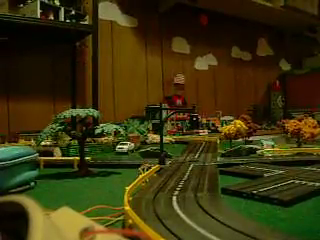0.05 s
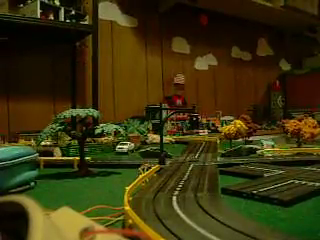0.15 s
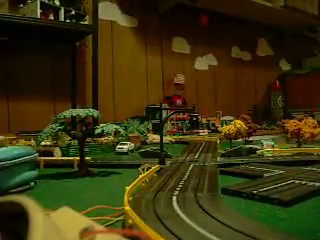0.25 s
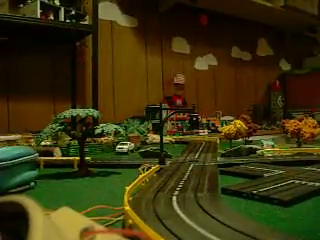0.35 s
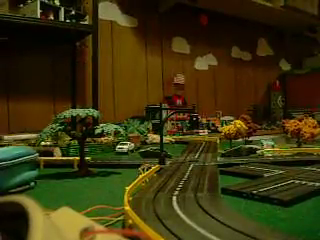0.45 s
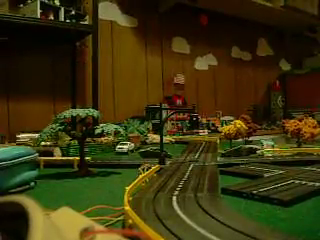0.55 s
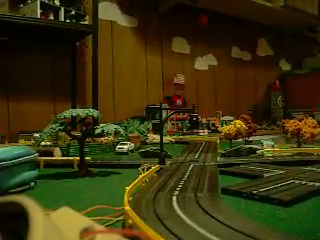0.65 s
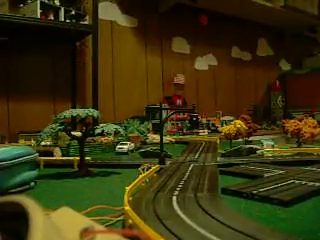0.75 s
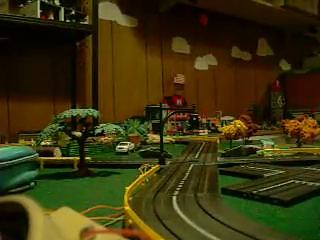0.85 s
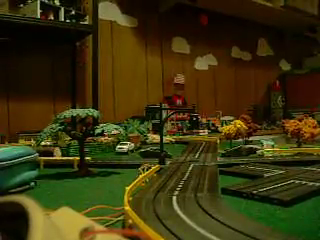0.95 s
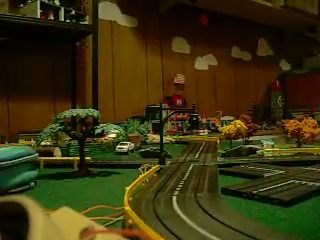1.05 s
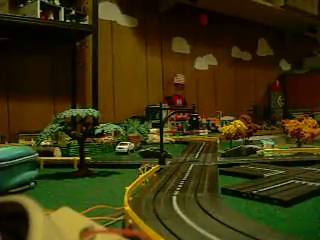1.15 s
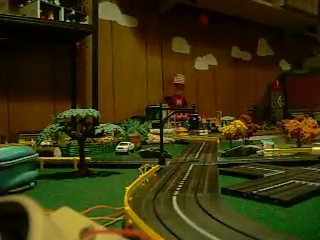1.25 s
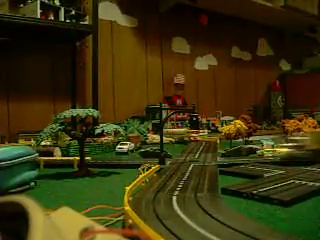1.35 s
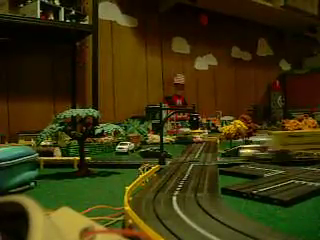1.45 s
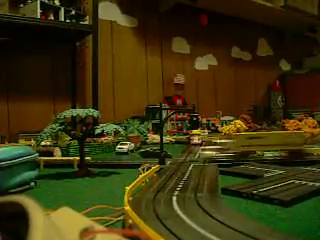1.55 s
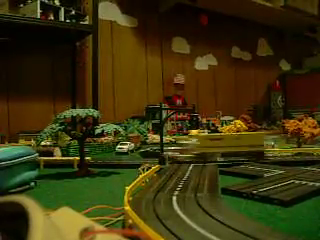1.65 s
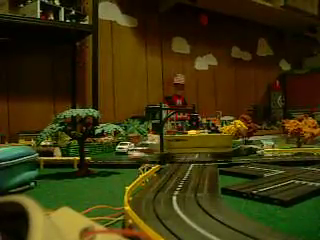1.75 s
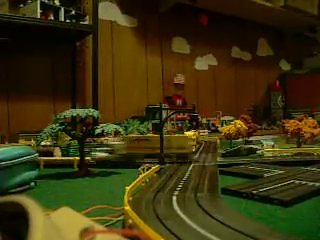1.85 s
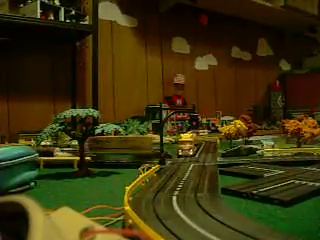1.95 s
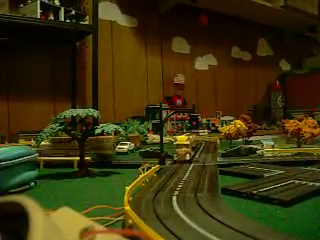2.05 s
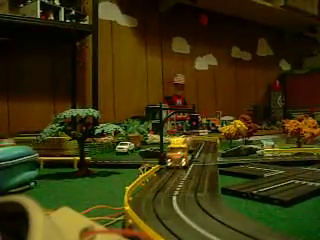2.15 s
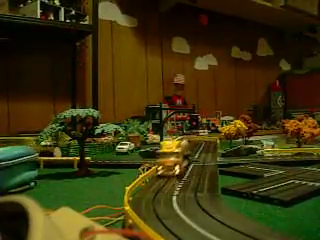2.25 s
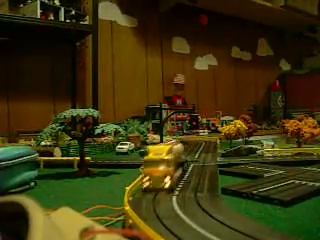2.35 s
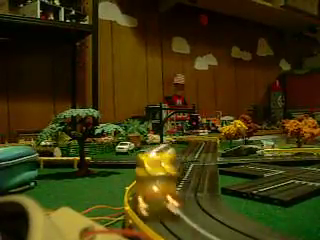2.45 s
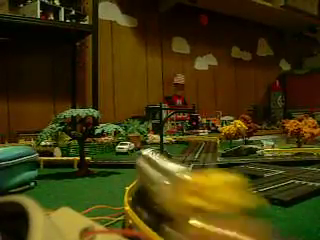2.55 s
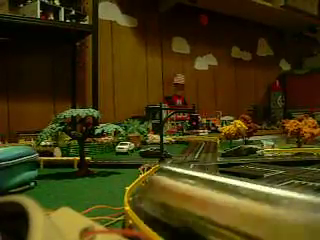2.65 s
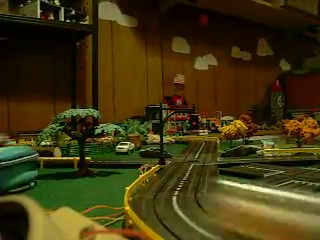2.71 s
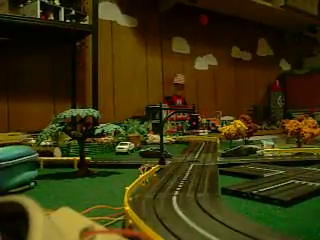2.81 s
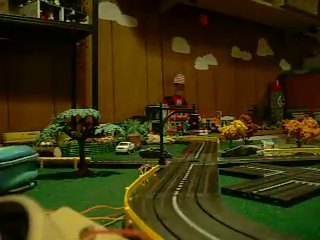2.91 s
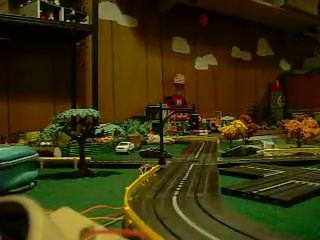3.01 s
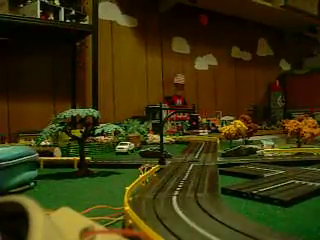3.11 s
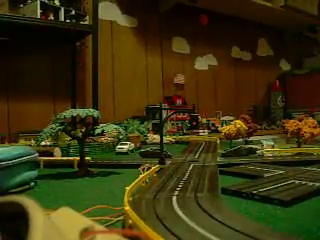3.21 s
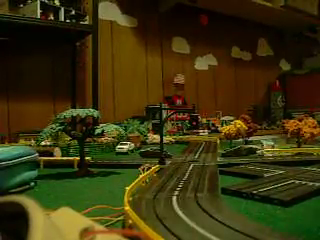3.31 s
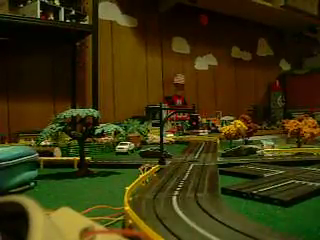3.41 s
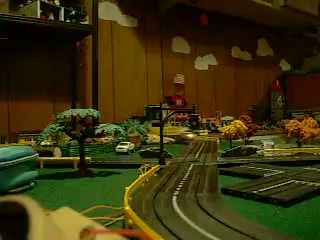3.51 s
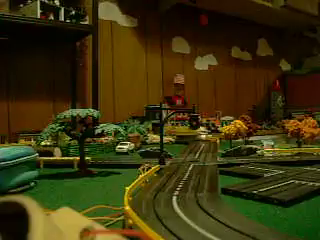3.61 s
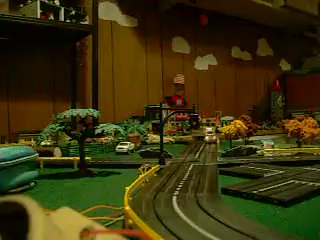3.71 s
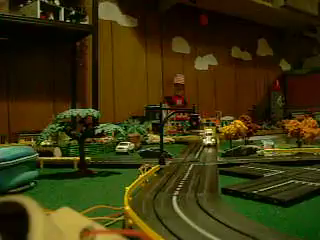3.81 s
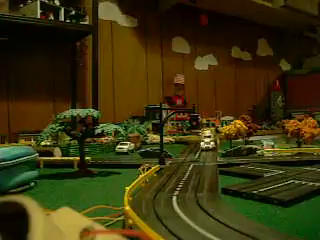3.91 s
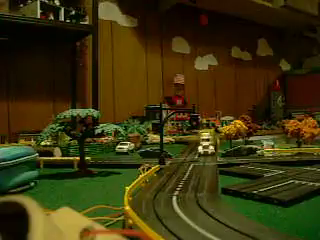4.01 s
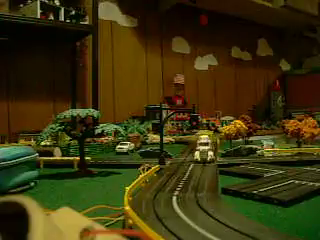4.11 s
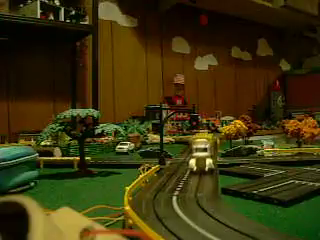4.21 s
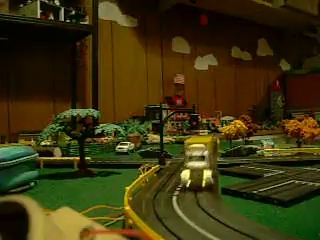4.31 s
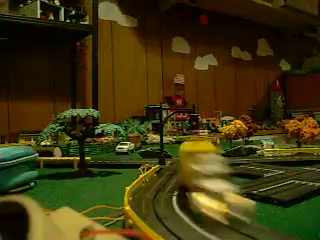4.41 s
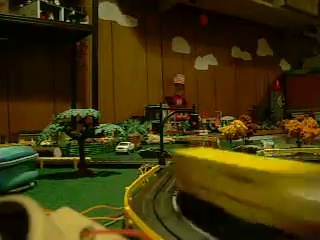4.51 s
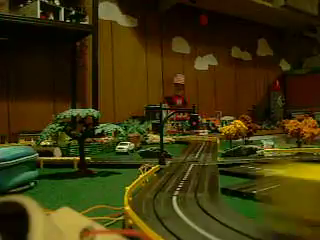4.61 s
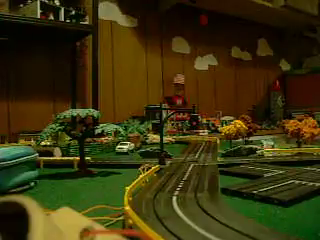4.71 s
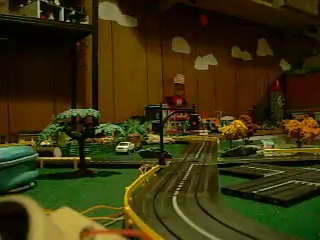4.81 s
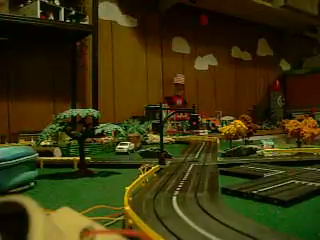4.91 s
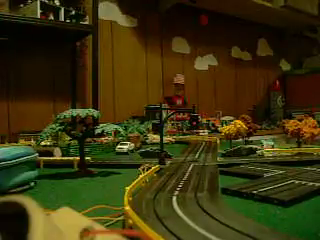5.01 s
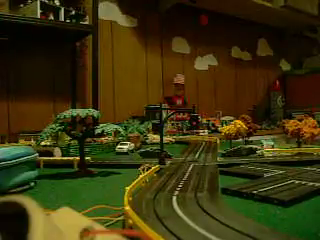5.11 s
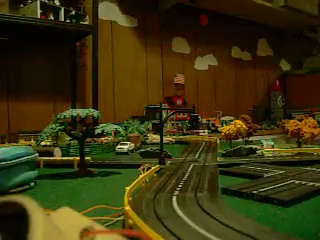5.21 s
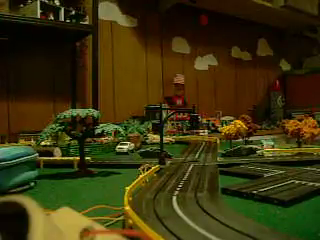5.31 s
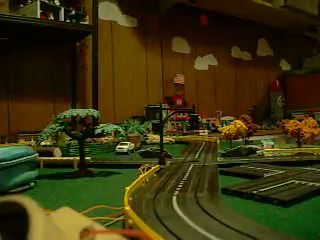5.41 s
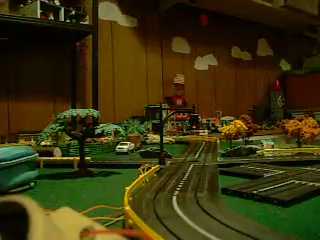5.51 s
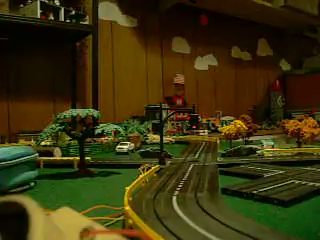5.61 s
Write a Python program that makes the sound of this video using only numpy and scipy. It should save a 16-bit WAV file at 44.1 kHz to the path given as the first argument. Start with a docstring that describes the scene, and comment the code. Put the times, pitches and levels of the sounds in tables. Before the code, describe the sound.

Two toy slot trucks rattle and clack around plastic track, swelling to two harsh, overloaded close passes above a faint low drone.

```python
"""Two small toy trucks lap a plastic slot track on a table, close to the camera's microphone.
Wheels, gears and pickup shoes make dense random chatter that rings the shells, chassis and track.
Joints clack as noise bursts, a guide pin knocks as short tones, loose track slaps and single parts buzz.
Under them the table top drones and rumbles; a short echo of the walls and a faint room tone lie behind.
The camera's narrow sound channel overloads on the loudest passes; one single-sample click is heard."""
import sys
import numpy as np
from scipy import signal
from scipy.fft import rfft, irfft, next_fast_len
from scipy.io import wavfile
from scipy.ndimage import map_coordinates

SR = 44100
rng = np.random.default_rng(int(sys.argv[2]) if len(sys.argv) > 2 else 0)


def transcribe(signal):
    """Save signal, clipped to [-1, 1], as a 16-bit WAV file at the path in sys.argv[1]."""
    frames = np.atleast_2d(signal).T
    limited = np.clip(frames, -1, 1)
    pcm = np.round(limited * 32767).astype(np.int16)
    wavfile.write(sys.argv[1], SR, pcm)


N = 249606

# Steady background of the place. Each row: frequency in Hz, relative spectrum level in dB.
ROOM_TONE_COLOUR = [(20, -8), (40, 5.5), (130, 3.5), (300, 4), (700, 3), (2000, -21), (5000, -14)]
# Resonance of the table top. Each row: centre in Hz, width in Hz, relative level in dB.
TABLE_MODE = [(190.4, 23, 0)]
# Drone of the table top, before a slight random wobble. Each row: time in seconds, level in dB.
DRONE_LEVELS = [(0.0, -39.5), (0.6, -50.5), (1.61, -41.5), (1.95, -52.5), (2.08, -35), (2.3, -49.5),
                (2.44, -36), (3.17, -45.5), (3.2, -40.5), (3.86, -42.5), (4.07, -53.5), (4.11, -37.5),
                (4.27, -41.5), (5.06, -44.5), (5.09, -34.5), (5.17, -48), (5.31, -39.5), (5.66, -46.5)]
# Dull rumble of the table legs. Each row: frequency in Hz, relative spectrum level in dB.
LEG_RUMBLE_COLOUR = [(15, -34), (30, -7), (130, -2.5), (300, -4.5), (500, 2), (900, -23), (2000, -83)]
# Dull bumps through the table. Each row: time in seconds, drive of the swell in dB.
TABLE_BUMPS = [(4.1, -34), (4.324, -32.5), (4.591, -27.5), (4.78, -39.5), (4.94, -35.5), (5.358, -41),
               (5.55, -37.5)]
# Hollow slaps of loose track pieces on the table. Each row: start in seconds, peak in dB, ring in Hz.
TRACK_SLAPS = [(0.122, -22, 1093), (0.323, -22.5, 1086), (0.438, -19.5, 1180), (0.694, -26, 1400),
               (2.116, -20.5, 1153), (2.134, -13, 1160), (2.167, -17, 1366), (2.216, -15.5, 1305),
               (2.264, -18.5, 1200), (2.422, -15.5, 1230), (2.466, -22, 1094), (2.521, -14, 1327),
               (2.543, -14.5, 1218), (2.71, -11, 1261), (2.749, -11, 1070), (2.897, -14, 1216),
               (2.929, -13, 1127), (2.991, -18, 1210), (3.002, -12, 1020), (3.272, -15, 1015),
               (3.303, -19, 823), (3.323, -17, 1124), (3.364, -15, 1290), (3.401, -17, 990),
               (3.414, -12, 923), (3.845, -17, 957), (4.051, -28, 1400), (4.104, -30, 920),
               (4.321, -15, 1424), (4.497, -22, 1430), (4.618, -13.5, 1432), (5.142, -23, 965),
               (5.287, -18, 1210), (5.462, -18, 963), (5.474, -11.5, 1000), (5.508, -16, 1460)]
# Hard knocks of a guide pin.
# Each row: centre in seconds, peak in dB, ring in Hz, length at half strength in ms.
PIN_KNOCKS = [(0.2919, -13, 2650, 2.1), (0.2968, -10.5, 2450, 1.4), (0.342, -6, 3790, 5.1),
              (0.441, -11, 2820, 4.2), (0.4467, -8, 3700, 2.0), (0.699, -6, 3370, 1.4),
              (0.7125, -6.5, 3250, 1.6), (0.836, -10, 3280, 3.0), (0.8436, 2.5, 3350, 3.2),
              (0.8553, 1, 3350, 3.1), (0.8661, -4.5, 3450, 4), (0.8812, -7, 3330, 1.8),
              (0.934, -10.5, 3400, 4.8), (1.1482, -8.5, 3300, 2.3), (1.16, -5, 3370, 2.2),
              (1.3984, -10.5, 3980, 3.2), (1.409, -9.5, 3700, 3.9), (1.454, -8, 3860, 4.5),
              (1.5676, -7.5, 3530, 2.9), (1.574, -10.5, 3760, 4.3), (1.5833, -6, 3580, 4.6),
              (1.5977, 2, 3320, 3.5), (1.613, -4.5, 3900, 3.0), (1.6216, -6.5, 3800, 3.6),
              (1.6331, -4, 3550, 2.7), (1.658, -3.5, 3240, 1.9), (1.6693, -4.5, 3740, 3.9),
              (1.6843, -4, 2790, 3.2), (1.7776, -10.5, 3450, 4.3), (1.801, -6, 3620, 1.3),
              (1.8052, -7.5, 3460, 4.1), (1.8165, -13.5, 3430, 2.0), (1.8844, -5.5, 3790, 6.5),
              (1.8893, -3, 3640, 3.6), (2.0122, -8, 3620, 2.7), (2.0587, -9.5, 2790, 4.5),
              (2.1326, -2, 2500, 2.6), (2.1687, -8, 2260, 1.9), (2.1882, -5, 2500, 1.0),
              (2.2008, -8.5, 3350, 1.4), (2.2038, 1, 3520, 2.0), (2.2078, -7, 3300, 2.2),
              (2.215, -7, 3200, 1.2), (2.3992, 2, 3540, 1.6), (2.4433, -7, 2840, 4.5),
              (2.4979, -6, 2780, 4.5), (2.5373, 1, 2690, 2.0), (2.5565, 1.5, 2640, 2.2),
              (2.5615, 1.5, 2660, 3.0), (2.5657, 2.5, 3220, 2.1), (2.582, 0, 2766, 2.5),
              (2.589, -8, 2784, 2.0), (2.593, 1, 2850, 1.6), (2.6015, 2.5, 2630, 2.1),
              (2.6093, 0.5, 2780, 2.4), (2.6172, 2.5, 2490, 4.0), (2.631, 0, 2690, 2.0),
              (2.6851, 2, 2700, 4.1), (2.689, -3, 2700, 1.4), (2.702, -7.5, 2750, 1.8),
              (2.7177, 1.5, 2720, 1.5), (2.7414, -2.5, 2300, 1.2), (2.7729, -8, 2790, 2.5),
              (2.784, -0.5, 2540, 2.5), (2.8170, 2, 2880, 1.6), (2.861, -6.5, 2650, 4.6),
              (2.898, 0, 2640, 2.1), (3.154, -8.5, 2560, 4.7), (3.1592, -8, 2210, 1.9),
              (3.3036, -8, 2710, 2.4), (3.325, -7.5, 2700, 3.4), (3.458, -11, 2160, 5.8),
              (3.8754, -10.5, 3820, 3.7), (3.8809, -6.5, 3940, 2.6), (4.0042, -6.5, 3100, 1.4),
              (4.0084, -9, 3620, 3.6), (4.065, -8, 3670, 3.4), (4.1002, -5.5, 3300, 4.2),
              (4.1158, 2, 3120, 2.2), (4.1402, -3.5, 2300, 2.0), (4.1835, -1, 3500, 2.1),
              (4.1893, 0, 3600, 2.2), (4.2037, -3, 3680, 4.0), (4.2133, -6, 3520, 1.4),
              (4.2172, -6.5, 3400, 1.4), (4.233, -3, 3830, 4.5), (4.24, -5, 3250, 5.1),
              (4.2707, -4.5, 3930, 3.1), (4.2826, -4.5, 3430, 2.2), (4.3229, 4, 3590, 2.0),
              (4.4183, -6.5, 3200, 4.0), (4.455, 2.5, 3070, 4.4), (4.4604, 3.5, 3530, 3.4),
              (4.4768, 1.5, 3420, 2.0), (4.501, 1.5, 2820, 2.1), (4.522, -1, 3750, 3.3),
              (4.547, -6.5, 3700, 4.0), (4.5603, 4.5, 3190, 3.5), (4.5949, 4, 3420, 4.0),
              (4.652, -1, 3380, 3.5), (4.6835, -5, 3240, 2), (4.6868, 1, 3250, 2.2),
              (4.8381, -4, 3900, 3.6), (4.8773, -6, 2590, 3.4), (5.3434, -10, 3580, 3.0),
              (5.4498, -10.5, 3700, 2.8)]
# One part buzzing above the rest.
# Each row: centre in seconds, duration in seconds, level in dB, resonance in Hz, its width in Hz.
PART_BUZZES = [(.97, 0.39, -36.5, 1000, 73.5), (2.59, 0.24, -16.5, 2680, 130),
               (2.812, 0.28, -22, 1074, 301), (4.576, 0.034, -5, 3424, 200), (4.619, .04, -7, 3410, 300),
               (4.948, .5, -38, 530, 80)]
# Loud clacks over track joints. Each row: start in seconds, strength in dB, ring in Hz,
# track thump relative to the strength in dB, drive of the after-rattle relative to the strength in dB.
JOINT_CLACKS = [(0.2894, -18, 2560, -25, -16.5), (0.3167, -7, 2750, -24, -9),
                (0.3372, -10.5, 3920, -17, -26), (0.3736, -15, 3300, -7, -29),
                (0.415, -14.5, 3270, -13, -15), (0.4414, -0.5, 3630, -20.5, -12),
                (0.4815, -10, 3420, -18.5, -16), (0.6931, -0.5, 3200, -16.5, -9.5),
                (0.842, 0, 3430, -23, -20.5), (0.864, -10, 3530, -26, -18), (0.881, -4.5, 3270, -18, -9.5),
                (0.9306, -13, 3340, -13, -26), (1.1483, -5, 3370, -26, -16),
                (1.1592, -2.5, 3330, -39.5, -16.5), (1.1924, -0.5, 3900, -31.5, -12),
                (1.2884, -15.5, 4000, -36, -15.5), (1.3954, 0, 3660, -26, -7.5),
                (1.45, -3, 3800, -32, -20.5), (1.5677, -9, 3560, -16, -16), (1.5826, -1, 3460, -38, -16.5),
                (1.5964, -5, 3460, -29, -16), (1.6212, 0, 3700, -26, -6), (1.6704, 0, 3810, -33, -17),
                (1.776, -9, 3300, -24, -16), (1.7982, -4, 3490, -28, -14.5), (1.8133, -12, 3440, -27, -8),
                (1.883, -1, 3800, -21.5, -18), (2.0101, -1, 3600, -28, -16), (2.059, -2, 3570, -18.5, -9.5),
                (2.1308, -3.5, 2300, -20, -17), (2.1653, -7.5, 2236, -9.5, -19.5),
                (2.185, -9, 2070, -19, -19.5), (2.1989, -4.5, 3500, -23, -21), (2.2326, -16, 2400, -5, -24),
                (2.3987, -11.5, 3480, -11, -20), (2.4401, -5, 2880, -25, -17.5),
                (2.4618, -8, 2634, -17, -20), (2.4948, -3, 3420, -27, -16), (2.5533, -1, 2710, -29, -19),
                (2.6024, 4, 2680, -16, -24), (2.616, -2, 2670, -16, -26), (2.6824, -7.5, 2604, -20, -19),
                (2.7154, -9, 2740, -12, -18), (2.7715, -7.5, 2610, -2.5, -19),
                (2.816, -5, 2790, -16, -15.5), (2.8584, -4, 2560, -8.5, -11.5),
                (2.8956, -14.5, 2850, -13, -21.5), (3.1552, -5, 2180, -9.5, -16),
                (3.3026, 0.5, 2520, -21, -14), (3.3214, -5.5, 2980, -20, -12.5),
                (3.3831, -10, 2180, -13.5, -16), (3.3991, -18, 2650, -13.5, -22),
                (3.4426, -18, 3900, -25, -28.5), (3.4565, -10, 2150, -9, -35),
                (3.8745, -11, 3900, -13, -25), (4.0027, -4, 3500, -30, -33), (4.0634, -1.5, 3730, -34, -15),
                (4.0984, 1.5, 3500, -18, -8), (4.141, -5.5, 3300, -15, -24), (4.18, -2, 3440, -28, -5),
                (4.232, 5, 3400, -31, -11), (4.2701, -1, 3880, -36.5, -27), (4.282, -15, 3400, -24, -29),
                (4.3209, 2.5, 3580, -22.5, -16), (4.366, -12, 3200, -18, -25),
                (4.4152, -0.5, 3360, -36, -5.5), (4.4517, 11, 3470, -26, -13),
                (4.4974, -3, 2880, -36, -19.5), (4.519, -3, 3740, -25, -17), (4.559, 4, 3430, -27, -18),
                (4.5951, 6.5, 3310, -35, -22), (4.6504, -6, 3440, -13, -18), (4.6871, -5.5, 3370, -22, -18),
                (4.7587, -1.5, 3680, -20.5, -21), (4.8341, -4, 3730, -15.5, -20),
                (4.9053, -2, 3390, -26, -16), (5.0536, -5.5, 2520, -14.5, -30.5),
                (5.1202, -9.5, 3450, -26, -10), (5.1429, -10.5, 3700, -9, -13.5),
                (5.2677, -12.5, 2640, -19.5, -5.5), (5.334, -6.5, 2150, -16, -18.5),
                (5.449, -6, 3800, -18, -16)]
# Running chatter, rising as a truck comes near the microphone.
# Each row: time in seconds, shell level in dB, chassis level in dB, track level in dB.
RUNNING_LEVELS = [(0, -28.5, -26.5, -33), (.25, -27, -28, -35), (.33, -23, -23.5, -25.5),
                  (.5, -25, -24.5, -31.5), (.6, -27.5, -28.5, -31.5), (.81, -25, -28, -34),
                  (.9, -28.5, -25.5, -33.5), (1.05, -23, -29.5, -32), (1.13, -32.5, -32.5, -37.5),
                  (1.22, -25.5, -29.5, -31.5), (1.49, -25.5, -25.5, -31.5), (1.55, -36.5, -30, -30.5),
                  (1.68, -27, -22.5, -27.5), (1.95, -29.5, -27.5, -34.5), (2.1, -26.5, -20, -28.5),
                  (2.35, -24.5, -22, -28), (2.57, -19.5, -17, -23), (2.78, -21, -19, -22.5),
                  (2.92, -23.5, -19.5, -27.5), (3.05, -29, -24, -26), (3.4, -24.5, -26.5, -26),
                  (3.5, -30, -28, -33.5), (3.8, -27, -27.5, -30.5), (3.97, -31.5, -34.5, -36),
                  (4.1, -25, -21, -29.5), (4.36, -22, -22.5, -31.5), (4.55, -16, -19.5, -28.5),
                  (4.57, -17.5, -14.5, -21.5), (4.63, -14.5, -11.5, -24.5), (4.64, -23.5, -26, -27.5),
                  (4.75, -24, -22, -29), (4.9, -24, -20.5, -30), (5.1, -22.5, -22.5, -26.5),
                  (5.23, -32, -30, -33), (5.36, -24.5, -22, -25.5), (5.66, -29, -28, -33)]
# Resonances of the body shells. Each row: centre in Hz, width in Hz, relative level in dB.
SHELL_MODES = [(3330, 403, -1), (3632, 233, 2.5), (3740, 170, 3.5), (4130, 380, -7.5)]
# Resonances of the chassis. Each row: centre in Hz, width in Hz, relative level in dB.
CHASSIS_MODES = [(2917, 280, -1.5), (2640, 232, 4), (2437, 363, 1.5), (1890, 270, -4.5)]
# Resonances of the track. Each row: centre in Hz, width in Hz, relative level in dB.
TRACK_MODES = [(554, 93, -8), (916, 185, -4), (1144, 157, -1.5), (1307, 295, -5), (1730, 110, -4.5)]
# The camera's narrow sound channel. Each row: frequency in Hz, gain in dB.
CHANNEL_RESPONSE = [(3800, -0.5), (4100, -3.5), (4300, -7), (4500, -20), (4750, -39.5), (5100, -120)]

RUMBLE_DB, RUMBLE_GROWS = -50, 0.53  # middle level; dB gained per dB of track chatter
BUMP_RISE_S, BUMP_T60_S = 0.026, .25
BUZZ_EVEN, DRONE_EVEN = .5, .25  # how far a ringing part holds its strength steady, 0-1
SLAP_RISE_S, SLAP_T60_S = 0.00025, 0.03
KNOCK_GRIT = 0.5  # broad crack mixed into the ring
DIP_S, DIP_SHARE = .002, .65  # dip under a knock: extra half-length, share of chatter turned down
CLACK_S, CLACK_RISE_S, CLACK_T60_S = 0.0064, 0.0022, 0.021  # bounces, then decay
BLOW_SHARE = .3  # peak of a clack's ringing burst, as a share of its strength
SMALL_PER_S, SMALL_THUMP_DB = 14, -15  # lesser clacks: rate, thump relative to strength
SMALL_OVER_DB, SMALL_SPREAD_DB = 9, 2  # over the running chatter; random spread
SMALL_LOW_HZ, SMALL_HIGH_HZ = 2300, 3900
SHELL_ABOVE_HZ = 3100  # clacks ringing from here up rattle the shell, lower ones the chassis
RATTLE_RISE_S, RATTLE_LEAD_S, RATTLE_T60_S = 0.0014, 0.0028, 0.12  # swells just before the blow
CHATTER_CEILING = .6  # soft ceiling on the summed chatter and clacks
OVERLOAD, TOP_HZ = .7, 15850  # hard clip level; top of the channel
CLICK_S, CLICK_DB = 3.534, -21  # single-sample click, level ahead of the last filter


def amp(db):
    """Gain of a level in dB."""
    return 10 ** (np.asarray(db) / 20)


def unit(x):
    """x at rms 1."""
    return x / np.sqrt(np.mean(x ** 2) + 1e-20)


def along(points, hz):
    """Values of (Hz, value) points, read on a log axis."""
    f, v = np.transpose(points)
    return np.interp(np.log(hz + 1), np.log(f + 1), v)


def curves(rows):
    """One value per sample for each column after the time."""
    s, *cols = np.transpose(rows)
    return [np.interp(np.arange(N) / SR, s, c) for c in cols]


def wobble(rate):
    """A smooth random curve, rate knots a second."""
    return map_coordinates(rng.standard_normal(N // 100), [np.arange(N) * rate / SR])


def filtered(x, response):
    """x times a response given as a function of frequency."""
    m = next_fast_len(N + SR // 2)
    return irfft(rfft(x, m) * response(np.fft.rfftfreq(m, 1 / SR)), m)[..., :N]


def coloured_noise(points):
    """Noise at rms 1 with the given spectrum."""
    return unit(filtered(rng.standard_normal(N), lambda hz: amp(along(points, hz))))


def banded(noise, low_hz, high_hz):
    """Noise held between two frequencies."""
    band = signal.butter(2, [low_hz, high_hz], "band", fs=SR, output="sos")
    return signal.sosfilt(band, noise)


def resonate(x, modes):
    """x ringing through a few resonances, summed with alternating sign."""
    def response(f):
        total = 0
        for k, (centre, width, db) in enumerate(modes):
            damping = 1j * f * width
            total = total + (-1) ** k * amp(db) * damping / (centre ** 2 - f ** 2 + damping)
        return total
    return filtered(x, response)


def steadied(x, share):
    """A narrow ringing with its swells partly evened out."""
    envelope = np.abs(signal.hilbert(x, next_fast_len(N))[:N])
    return unit(x / (envelope + .1) ** share)


def chatter(per_s, spread_db, scrape_db):
    """Irregular tiny knocks, a few much stronger than the rest, over a steady scrape."""
    draw = rng.random((3, N))
    size = amp(-spread_db * np.log(draw[1] + 0.00039)) * np.sign(draw[2] - .5)
    hits = unit(size * (draw[0] < per_s / SR))
    return hits + amp(scrape_db) * rng.standard_normal(N)


def track_ring(x):
    """The track's modes; being thin, it radiates little bass."""
    return filtered(resonate(x, TRACK_MODES), lambda f: (f / 750) ** 2 / (1 + (f / 750) ** 2))


def room_tone():
    """A faint steady noise of the place, far behind the track."""
    return amp(-43.5) * coloured_noise(ROOM_TONE_COLOUR)


def room(x):
    """A short diffuse answer of the walls: decaying noise that starts after 4 ms."""
    t = np.arange(SR // 3) / SR
    tail = rng.standard_normal(len(t)) * amp(-60 * t / 0.26) * (t > .004)
    return signal.fftconvolve(x, tail / np.linalg.norm(tail))[:N]


def table_drone():
    """The motors keep one low mode of the table top droning: noise rings it twice over."""
    ring = resonate(resonate(rng.standard_normal(N), TABLE_MODE), TABLE_MODE)
    level_db = curves(DRONE_LEVELS)[0] + 1.2 * wobble(7.9)
    return amp(level_db) * steadied(unit(ring), DRONE_EVEN)


def table_rumble():
    """The legs rumble with the track chatter, and bump now and then as brief swells."""
    track_db, t = curves(RUNNING_LEVELS)[2], np.arange(N) / SR
    level = amp(RUMBLE_DB + RUMBLE_GROWS * (track_db - track_db.mean()) + 4.6 * wobble(4.8))
    for s, db in TABLE_BUMPS:
        after = np.maximum(t - s + BUMP_RISE_S, 0)
        swell = amp(-60 * after / BUMP_T60_S) * (1 - np.exp(-after / BUMP_RISE_S))
        level = level + 2 * amp(db) * swell
    return level * coloured_noise(LEG_RUMBLE_COLOUR)


def slaps():
    """A loose piece of track rings low for a moment, as a decaying sine."""
    out, t = np.zeros(N + SR), np.arange(SR // 10) / SR
    shape = amp(-60 * t / SLAP_T60_S) * (1 - np.exp(-t / SLAP_RISE_S))
    for s, db, hz in TRACK_SLAPS:
        out[round(s * SR):][:len(t)] += amp(db) * shape / shape.max() * np.sin(2 * np.pi * hz * t)
    return out[:N]


def knocks():
    """A hard knock rises fast, rings for a few cycles and carries some grit."""
    out, t = np.zeros(N + SR), np.arange(SR // 50) / SR
    grit = banded(rng.standard_normal((len(PIN_KNOCKS), len(t))), 1500, 4300)
    for (s, db, hz, length_ms), crack in zip(PIN_KNOCKS, grit):
        rise = length_ms / 2450  # seconds; this shape is 2.45 rises long at half strength
        shape = t / rise * np.exp(1 - t / rise)
        start = round((s - 1.46 * rise) * SR)  # puts the middle of the half-strength span at s
        blow = shape * (np.cos(2 * np.pi * hz * (t - rise)) + KNOCK_GRIT * unit(crack))
        out[start:][:len(t)] += amp(db) * blow / np.abs(blow).max()
    return out[:N]


def chatter_dips():
    """The chatter is turned down for a moment under each knock, so the knock stands clear."""
    gain, t = np.ones(N + SR), np.arange(-SR // 50, SR // 50) / SR
    for s, _, _, length_ms in PIN_KNOCKS:
        dip = np.exp(-(t / (DIP_S + length_ms / 2000)) ** 4)
        gain[round(s * SR) - SR // 50:][:len(t)] *= 1 - DIP_SHARE * dip
    return gain[:N]


def buzzes():
    """Dense chatter rings a single resonance for a while."""
    t, out = np.arange(N) / SR, np.zeros(N)
    for s, length, db, hz, width in PART_BUZZES:
        ring = unit(resonate(chatter(760, spread_db=1.5, scrape_db=-1.5), [(hz, width, 0)]))
        swell = np.exp(-(2 * (t - s) / length) ** 4)
        out += amp(db) * swell * steadied(ring, BUZZ_EVEN)
    return out


def small_clacks(count):
    """Lesser clacks fall at random, a little over the running chatter around them."""
    draw = rng.random((count, 3))
    s = (np.arange(count) + draw[:, 0]) / SMALL_PER_S
    shell_db, chassis_db, _ = curves(RUNNING_LEVELS)
    at = np.minimum((s * SR).astype(int), N - 1)
    hz = SMALL_LOW_HZ + (SMALL_HIGH_HZ - SMALL_LOW_HZ) * draw[:, 1]
    spread_db = -SMALL_SPREAD_DB * np.log(draw[:, 2] + 0.2)
    db = (shell_db[at] + chassis_db[at]) / 2 + SMALL_OVER_DB + spread_db
    rows = np.transpose([s, db, hz, np.full(count, SMALL_THUMP_DB)])
    return [tuple(row) for row in rows if row[0] < N / SR]


def clacks():
    """Each joint gives a short burst of bounces that rings the plastic and thumps the track."""
    ring, thump, t = np.zeros(N + SR), np.zeros(N + SR), np.arange(SR // 10) / SR
    rows = JOINT_CLACKS + small_clacks(count=120)
    noise = rng.standard_normal((len(rows), 2, len(t)))
    plastic = banded(noise[:, 1], 1900, 4200)
    shape = amp(-60 * np.maximum(t - CLACK_S, 0) / CLACK_T60_S) * (1 - np.exp(-t / CLACK_RISE_S))
    pole = np.exp(-np.pi * 280 / SR)  # a resonance 280 Hz wide
    for (s, db, hz, thump_db, *_), (a, b), wide in zip(rows, noise, plastic):
        resonator = [1, -2 * pole * np.cos(2 * np.pi * hz / SR), pole ** 2]
        tone = unit(signal.lfilter([1, 0, -1], resonator, a))
        burst = shape * (tone + 1.3 * unit(wide))
        start = round(s * SR)
        ring[start:][:len(t)] += BLOW_SHARE * amp(db) * burst / np.abs(burst).max()
        thump[start:][:len(t)] += amp(db + thump_db) * shape * b
    passed = np.std(track_ring(noise.ravel()[:N]))  # share of a broad blow that the track's modes pass
    return ring[:N] + track_ring(thump[:N]) / passed


def rattles():
    """After a loud clack the shell or the chassis goes on rattling for a moment: a gain for each."""
    kicks, t = np.zeros((2, N)), np.arange(SR // 3) / SR
    for s, db, hz, _, rattle_db in JOINT_CLACKS:
        part = int(hz < SHELL_ABOVE_HZ)  # 0 shell, 1 chassis
        kicks[part, round((s - RATTLE_LEAD_S) * SR)] += amp(db + rattle_db)
    swell = amp(-60 * t / RATTLE_T60_S) * (1 - np.exp(-t / RATTLE_RISE_S))
    return np.abs(signal.fftconvolve(kicks, swell[None], axes=1)[:, :N])


def trucks():
    """One jolting motion shakes shell, chassis and track; each part also rattles on its own."""
    shell_db, chassis_db, track_db = curves(RUNNING_LEVELS)
    shell_rattle, chassis_rattle = rattles()
    jolt = 1.52 * wobble(110) + 1.0 * wobble(22.08)  # dB
    shared = chatter(450, spread_db=2.5, scrape_db=-5)
    shell = resonate(shared + 1.3 * chatter(450, spread_db=1.5, scrape_db=-4.5), SHELL_MODES)
    chassis = resonate(shared + 1.2 * chatter(600, spread_db=2.5, scrape_db=-3.0), CHASSIS_MODES)
    track = track_ring(shared + 1.0 * chatter(300, spread_db=1.0, scrape_db=-2))
    shell = unit(amp(1.23 * jolt + 1.7 * wobble(35)) * shell)
    chassis = unit(amp(1.14 * jolt + 0.93 * wobble(30)) * chassis)
    track = unit(amp(.5 * jolt + 1.2 * wobble(24.96)) * track)
    return ((amp(shell_db) + shell_rattle) * shell
            + (amp(chassis_db) + chassis_rattle) * chassis
            + amp(track_db) * track)


def scene():
    """Trucks close by with their echo off the walls, the table under them and the background."""
    running = trucks() + clacks()
    running = running / (1 + np.abs(running / CHATTER_CEILING) ** 4) ** (1 / 4)
    near = chatter_dips() * (running + buzzes()) + knocks() + slaps()
    table = table_drone() + table_rumble()
    return (near + amp(-12.0) * room(near) + table + room_tone())[None]


def record(dry):
    """The input stage saturates, a narrow channel follows, and the last peaks clip hard, spraying treble."""
    squeezed = dry / (1 + np.abs(dry / 0.8) ** 5) ** (1 / 5)
    narrow = filtered(squeezed, lambda hz: amp(along(CHANNEL_RESPONSE, hz)))
    clipped = np.clip(narrow, -OVERLOAD, OVERLOAD)
    click = amp(CLICK_DB) * (np.arange(N) == round(CLICK_S * SR))
    return filtered(clipped + click, lambda hz: hz < TOP_HZ)


dry = scene()
out = record(dry)
transcribe(out)
```